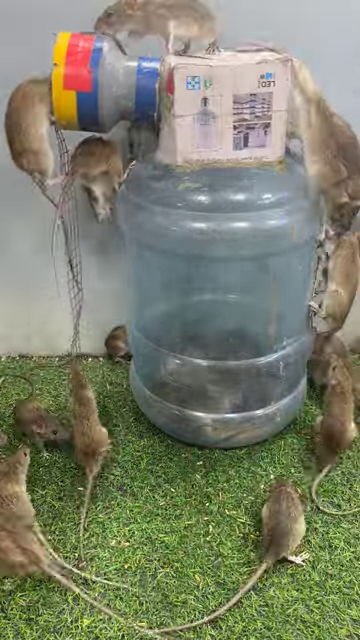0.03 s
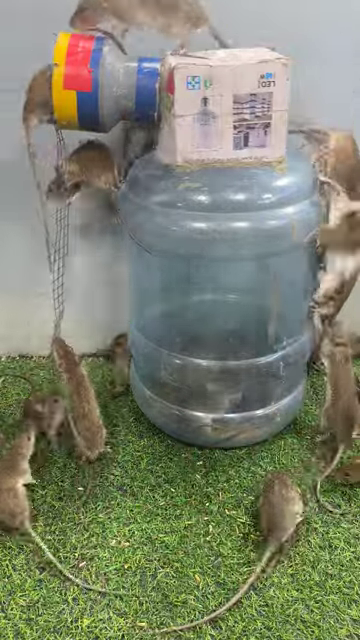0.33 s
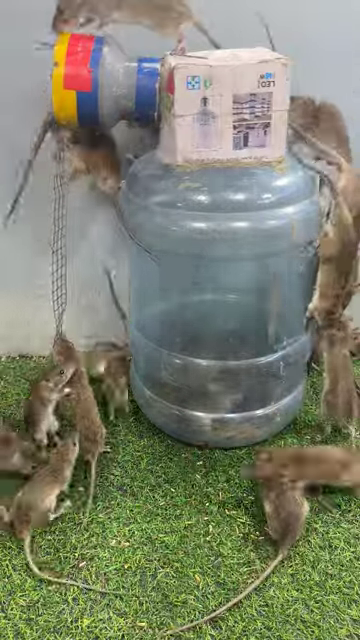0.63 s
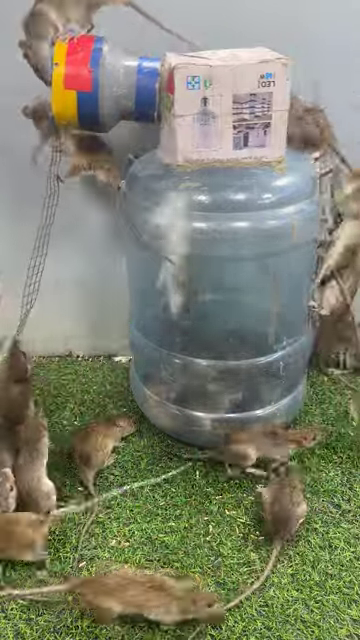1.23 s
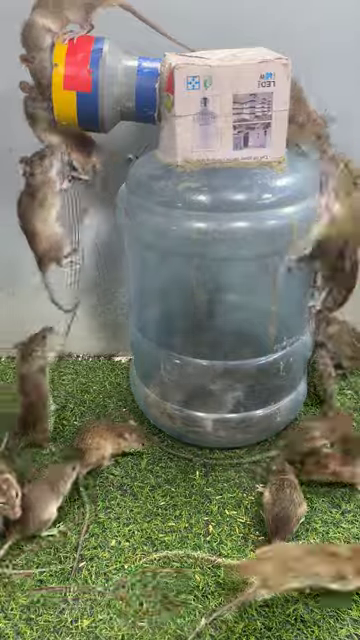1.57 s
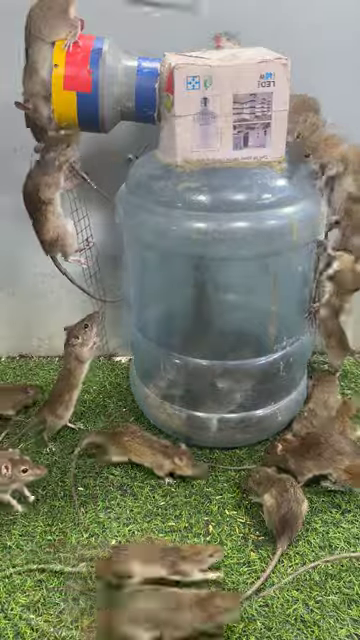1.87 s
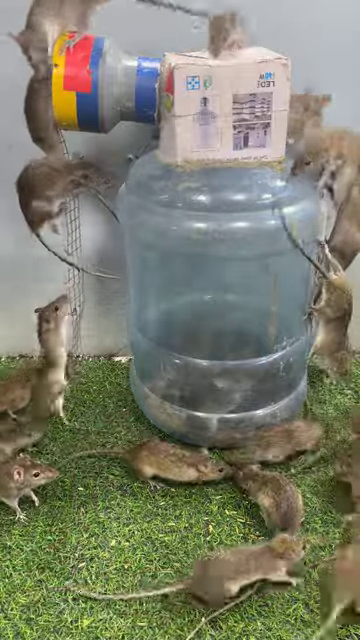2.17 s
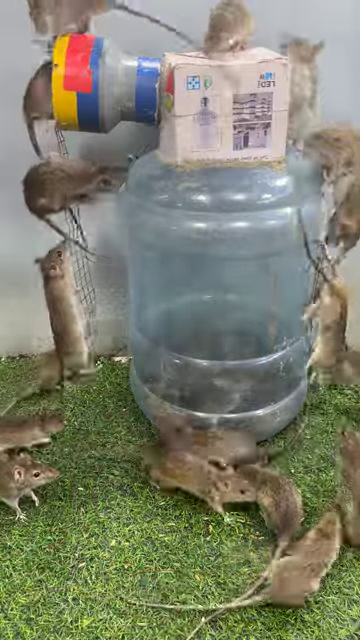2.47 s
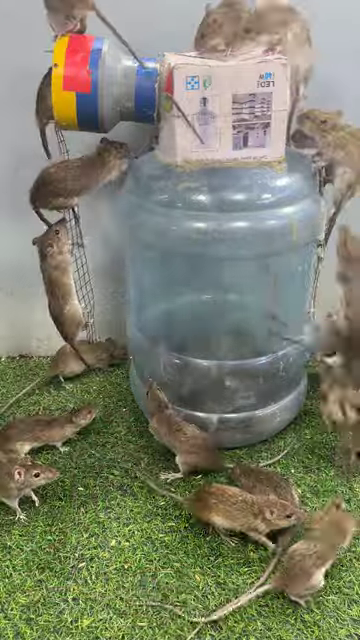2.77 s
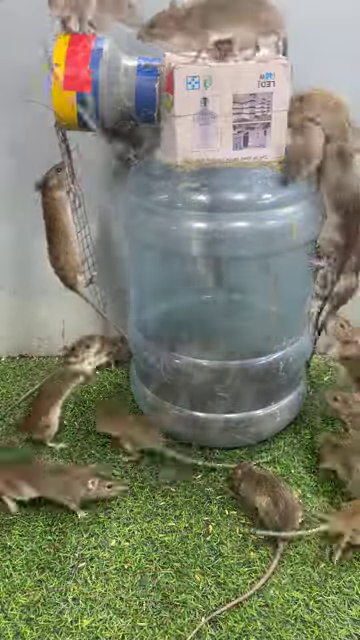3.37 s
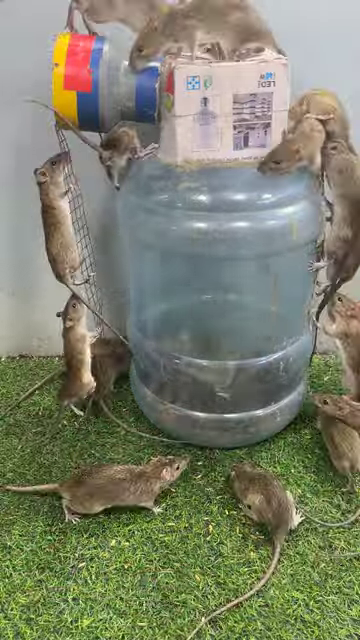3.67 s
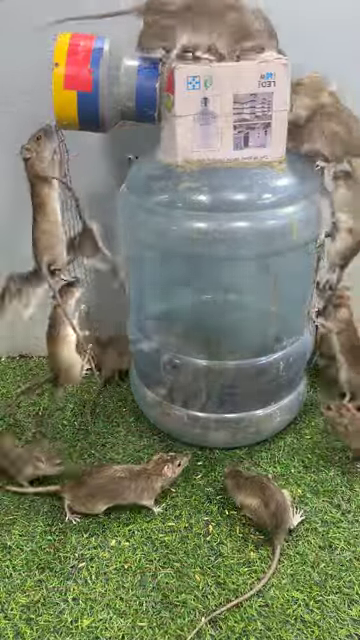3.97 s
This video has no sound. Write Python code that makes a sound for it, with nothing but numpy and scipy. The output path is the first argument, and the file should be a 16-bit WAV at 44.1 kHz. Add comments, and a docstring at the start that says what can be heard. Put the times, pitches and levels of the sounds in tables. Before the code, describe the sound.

Close scurrying of rats in a small hard room: light patter and scratching on plastic, wire mesh and artificial grass, with dull thumps. It eases briefly midway, then resumes with a hollow knock on a jug, over a faint rumble.

```python
"""Rats scramble over artificial grass, a wire mesh and a big plastic water jug that stands against a wall.
Their paws excite damped resonances of the plastic by friction and impact, many tiny contacts merge
into patter and rustle, and claws click. Bodies land with dull thumps, and now and then a bump rings
the modes of the hollow jug. A small hard room reverberates, over a low steady rumble."""
import sys
import numpy as np
from scipy import signal
from scipy.fft import rfft, irfft, next_fast_len
from scipy.io import wavfile
from scipy.ndimage import map_coordinates

SR = 44100
rng = np.random.default_rng(int(sys.argv[2]) if len(sys.argv) > 2 else 0)


def master_out(mix):
    """Clip the mix to full scale and print it as 16-bit PCM to the path in sys.argv[1]."""
    frames = np.transpose(np.atleast_2d(mix))
    ceiling = np.clip(frames, -1, 1)
    pcm = np.round(ceiling * 32767).astype(np.int16)
    wavfile.write(sys.argv[1], SR, pcm)


N = 176400


def amp(db):
    """Amplitude ratio of a level in decibels."""
    return 10 ** (np.asarray(db) / 20)

def unit(x):
    """Normalisation of power: rms 1."""
    return x / np.sqrt(np.mean(x ** 2) + 1e-20)

def burst(x):
    """Normalisation of energy: that of 10 ms at rms 1."""
    return x * np.sqrt(SR / 100 / np.sum(x ** 2))

def add(track, start, x):
    """Superposition: x joins the track at start seconds."""
    i = max(0, round(start * SR))
    track[i:i + len(x)] += x[:max(0, len(track) - i)]

def curve(rows):
    """Linear interpolation of (time, value) rows at every sample."""
    return np.interp(np.arange(N) / SR, *np.transpose(rows))

def along(points, hz):
    """Interpolation of (frequency, value) points on a logarithmic axis."""
    knots, values = np.transpose(points)
    return np.interp(np.log(hz + 1), np.log(knots + 1), values)

def jitter(t, step):
    """Random modulation: Gaussian values, step samples apart, joined by straight lines."""
    return np.interp(t, t[::step], rng.standard_normal(len(t[::step])))

def filtered(x, response):
    """Linear filtering: the spectrum of x times a complex frequency response."""
    n = x.shape[-1]
    size = next_fast_len(n + SR // 10)
    return irfft(rfft(x, size) * response(np.fft.rfftfreq(size, 1 / SR)), size)[..., :n]

def coloured(x, spectrum, size=4096):
    """Minimum-phase filtering: folding the cepstrum makes the given spectrum a causal response."""
    cepstrum = irfft(np.log(amp(along(spectrum, np.fft.rfftfreq(size, 1 / SR)))))
    cepstrum[1:size // 2] *= 2
    cepstrum[size // 2 + 1:] = 0
    return signal.fftconvolve(x, irfft(np.exp(rfft(cepstrum))))[:len(x)]


# Stereo width of diffuse sound: (frequency [Hz], side over mid [dB])
DIFFUSE_WIDTH = [(60, -47), (200, -16.5), (600, -4.5), (10000, -5)]
def spread(mid, side):
    """Diffuse field: left and right are nearly alike at long wavelengths and differ more at short ones."""
    side = filtered(side, lambda hz: amp(along(DIFFUSE_WIDTH, hz)))
    return np.array([mid + side, mid - side])


# Background noise of the room: (frequency [Hz], gain [dB])
RUMBLE_SPECTRUM = [(22, -12), (55, 7.5), (120, -2), (250, -7), (2500, -21.5), (5000, -27), (16000, -57.5)]
def rumble():
    """Stationary noise: the room's low, diffuse rumble."""
    mid, side = [unit(coloured(rng.standard_normal(N), RUMBLE_SPECTRUM)) for _ in range(2)]
    return amp(-47.5) * spread(mid, side)


# Reverberation of the room: (frequency [Hz], time to fall by 60 dB [s])
ROOM_T60 = [(150, 0.35), (3000, 0.27), (14000, 0.16)]
def room(x, segments=20, gap_s=.004):
    """Reverberation: wall echoes decay exponentially; a new tail per segment stands for the rats moving."""
    out = np.zeros((2, N))
    for i, part in enumerate(np.array_split(x, segments)):
        hz, t, noise = signal.stft(rng.standard_normal((2, SR // 3)), SR, nperseg=256)
        decay = amp(-60 * t / along(ROOM_T60, hz)[:, None])
        mid, side = signal.istft(noise * decay, SR, nperseg=256)[1]
        for ear, tail in zip(out, spread(mid, side) / np.linalg.norm(mid)):
            add(ear, i * N / segments / SR + gap_s, signal.fftconvolve(part, tail))
    return out


# Soft landings of a body: (time [s], level [dB], frequency [Hz])
LANDINGS = [(0.419, -13.5, 153.5), (0.486, -20.5, 119), (0.575, -19, 124), (0.603, -20, 119),
            (0.931, -21, 160), (1.15, -22.5, 142.5), (1.611, -13.5, 165.6), (1.681, -21.5, 183),
            (2.45, -27.5, 177.5), (3.67, -23, 171), (3.776, -26.5, 182)]
def thumps(rise_s=.0032, t60_s=.11):
    """Damped oscillation: a soft body lands and sets off a few low cycles."""
    out, t = np.zeros(N), np.arange(SR // 3) / SR
    for start, db, hz in LANDINGS:
        envelope = amp(db - 60 * t / t60_s) * (1 - np.exp(-t / rise_s))
        add(out, start, envelope * np.sin(2 * np.pi * hz * t))
    return out


# Modes of the jug: (frequency [Hz], relative level [dB])
JUG_MODES = [(120, -13), (183, -10), (275, -5.5), (398, -4), (466, -0.5), (532, -5.5), (622, -3.5),
             (785, -4.5), (1025, 1), (1470, -2.5), (1790, 1.5)]
# Bumps of a body against the jug: (time [s], level [dB], cut-off frequency [Hz])
JUG_BUMPS = [(.42, -23.5, 250), (0.6242, -21.5, 610), (.927, -25, 800), (0.942, -24.5, 450),
             (.974, -28.5, 500), (1.613, -29, 600), (2.788, -16.5, 900)]
def jug(rise_cycles=.94, t60_cycles=51):
    """Modal vibration: low modes swell last and ring longest; a bump with a low cut-off barely excites the
    upper ones."""
    out, t = np.zeros(N), np.arange(SR // 2) / SR
    for start, db, cutoff_hz in JUG_BUMPS:
        ring = 0
        for k, (hz, mode_db) in enumerate(JUG_MODES):
            phase = 2 * np.pi * hz * t + .25 * jitter(t, step=200)
            excitation = (-1) ** k / np.hypot(1, hz / cutoff_hz)
            swell = 1 - np.exp(-t * hz / rise_cycles)
            decay = amp(mode_db - 60 * t * hz / t60_cycles)
            ring = ring + excitation * swell * decay * np.sin(phase)
        add(out, start, amp(db) * ring)
    return out


def claw_squeal(start=2.693, length_s=.022, from_hz=6600, to_hz=4300, roughness=.35):
    """Sliding friction: one claw slips with a thin, rough, falling squeal."""
    out, t = np.zeros(N), np.arange(SR // 20) / SR
    progress = np.minimum(t / length_s, 1)
    glide_hz = from_hz + (to_hz - from_hz) * progress
    hz = glide_hz * (1 + roughness * rng.standard_normal(len(t)))
    add(out, start, amp(-45) * np.sin(np.pi * progress) * np.sin(2 * np.pi * np.cumsum(hz) / SR))
    return out


# Spectrum of a claw's contact: (frequency [Hz], gain [dB])
CLAW_SPECTRUM = [(700, -24), (3000, 10.5), (4500, -0.5), (7500, 3), (16000, -2)]
# Claws catching on mesh and plastic: (time [s], level [dB])
CLAW_STRIKES = [(.302, -36.5), (0.412, -34.5), (0.924, -39), (0.933, -34), (1.067, -44), (1.152, -44),
                (1.185, -34), (1.355, -38), (1.628, -29), (1.653, -44), (2.787, -35.5), (3.308, -50)]
def claw_clicks(decay_s=.0029):
    """Hard impact: a very short contact gives a bright, broadband click."""
    out, t = np.zeros(N), np.arange(SR // 20) / SR
    for start, db in CLAW_STRIKES:
        contact = rng.standard_normal(len(t)) * np.exp(-t / decay_s)
        add(out, start, amp(db) * burst(coloured(contact, CLAW_SPECTRUM)))
    return out


def grains(per_s, scatter_db):
    """Poisson process: tiny contacts at random moments, with scattered sizes."""
    impulses = (rng.random(N) < per_s / SR) * rng.choice([-1, 1], N)
    return impulses * amp(scatter_db * np.clip(rng.standard_normal(N), -2, 2))

def wobble(knots_per_s):
    """Spline interpolation of random values: a smooth fluctuation."""
    return map_coordinates(rng.standard_normal(2000), [np.arange(N) * knots_per_s / SR], mode="wrap")


# Spectra of feet on plastic and of soft footfalls: (frequency [Hz], gain [dB])
PATTER_SPECTRUM = [(100, -18.5), (300, 9), (1000, 4), (1700, -4), (2800, -2.5), (4200, -14), (16000, -20)]
PADDING_SPECTRUM = [(25, -29.5), (60, -2.5), (120, 0), (190, -0.5), (260, -10.5), (1500, -42.5)]
# High, hissy rustle; the notch at 12 kHz is not part of the grass's sound: (frequency [Hz], gain [dB])
RUSTLE_SPECTRUM = [(1000, -37), (2800, -4), (6500, 17), (10000, 20.5), (12000, -45), (16000, 20)]
# How busy the rats are, and the weight of their soft footfalls: (time [s], relative level [dB])
ACTIVITY = [(0, -48.5), (.32, -45), (.55, -51.5), (.76, -50), (.97, -41.5), (1.25, -50.5), (1.72, -45.5),
            (1.92, -51), (2.1, -62), (2.26, -52), (2.35, -52.5), (2.55, -56.5), (3.02, -47), (3.22, -52),
            (3.6, -47), (3.79, -51.5), (4, -41)]
FOOTFALL_WEIGHT = [(0, -35.5), (.7, -35.5), (1.3, -42), (1.8, -40.5), (2.15, -51), (2.8, -43),
                   (3.55, -47.5), (4, -44)]
def scurry(flurry_db=5):
    """Shot noise: many small contacts merge into patter, hissy rustle, stray claw ticks and padding."""
    flurry = amp(flurry_db * np.tanh(wobble(knots_per_s=45)))
    patter = unit(coloured(grains(per_s=1400, scatter_db=5) * flurry, PATTER_SPECTRUM))
    rustle = unit(coloured(grains(per_s=2500, scatter_db=5) * flurry, RUSTLE_SPECTRUM))
    ticks = unit(coloured(grains(per_s=61, scatter_db=3), CLAW_SPECTRUM))
    padding = unit(coloured(grains(per_s=250, scatter_db=1.5), PADDING_SPECTRUM))
    bright = amp(3.5) * patter + amp(-4.5) * rustle + amp(-13.5) * ticks
    return amp(curve(ACTIVITY)) * bright + amp(curve(FOOTFALL_WEIGHT) + .5) * padding


def resonance(x, hz, q):
    """Resonance with steep skirts: two equal second-order band-passes in cascade."""
    return filtered(x, lambda f: (1j * f * hz / q / (hz * hz - f * f + 1j * f * hz / q)) ** 2)


# Spectrum of a paw rubbing plastic: (frequency [Hz], gain [dB])
SCUFF_SPECTRUM = [(200, 18), (1000, 9.5), (2700, 6), (4200, -1.5), (8000, 3), (16000, -1)]
def scuff(hz, decay_s=.0077, q=.64, grit_db=3.5):
    """Friction noise: a gritty push swells and dies, driving a broad resonance of the plastic."""
    t = np.arange(SR // 6) / SR
    grit = rng.choice([-1, 1], len(t)) * amp(grit_db * jitter(t, step=40))
    rise_s = decay_s / 4
    push = grit * np.exp(-t / decay_s) * (1 - np.exp(-t / rise_s))
    return burst(coloured(resonance(push, hz, q), SCUFF_SPECTRUM))


# Quick hollow taps on plastic: (time [s], relative level [dB], frequency [Hz])
PAW_TAPS = [(.376, -31.5, 1430), (0.964, -26, 1110), (1.166, -26.5, 1285), (1.529, -33.5, 1520),
            (2.2, -44, 1710), (3.163, -35.5, 2030), (3.164, -33.5, 1066), (3.557, -35, 1340),
            (3.828, -30.5, 1590)]
def taps(spot_q=12.6, wall_hz=985, wall_q=15, wall_db=-3.5, rise_s=.00041, skid_db=-4):
    """Free vibration: the struck spot rings briefly, the wall around it lower and longer; claws skid."""
    out, t = np.zeros(N), np.arange(SR // 20) / SR
    for start, db, spot_hz in PAW_TAPS:
        for hz, q, part_db in (spot_hz, spot_q, 0), (wall_hz, wall_q, wall_db):
            phase = 2 * np.pi * hz * t + .38 * jitter(t, step=30)
            envelope = np.exp(-np.pi * hz * t / q) * (1 - np.exp(-t / rise_s))
            add(out, start, amp(db + part_db) * burst(envelope * np.sin(phase)))
        add(out, start, amp(db + skid_db) * scuff(spot_hz))
    return out


# Paws scuffing plastic: (time [s], relative level [dB], resonance frequency [Hz], decay time [s])
PAW_SCUFFS = [(.048, -29.5, 1490, 0.014), (0.111, -29, 850, 0.0057), (0.261, -30, 1310, .01),
              (.299, -25.5, 990, 0.019), (0.622, -22, 910, 0.0055), (0.831, -30, 1420, 0.025),
              (0.883, -25, 1270, 0.058), (.9246, -20.5, 850, 0.015), (0.959, -29.5, 1870, 0.0064),
              (0.976, -26, 1620, 0.0056), (1.525, -26.5, 1370, .01), (1.601, -22, 900, 0.023),
              (1.653, -28, 2450, 0.0045), (2.318, -35, 1270, .014), (2.648, -33, 1160, 0.016),
              (2.683, -28.5, 617, .008), (2.766, -27, 770, 0.013), (2.787, -24.5, 1800, 0.0064),
              (3.299, -29, 2330, 0.0046), (3.553, -33, 1470, 0.0068), (3.7, -29.5, 2500, 0.0099),
              (3.866, -29, 544, 0.026)]
# Small claw scratches: (time [s], relative level [dB])
CLAW_SCRATCHES = [(.181, -56), (.411, -30), (.471, -36.5), (0.768, -38), (1.047, -33), (1.187, -30.5),
                  (1.279, -39.5), (1.355, -37), (1.436, -36), (1.704, -33.5), (1.842, -31.5),
                  (1.978, -38.5), (2.92, -36), (2.962, -41), (3.268, -40), (3.399, -37.5), (3.925, -45),
                  (3.974, -38)]
def paws(scratch_hz=1480):
    """Forced vibration: each scuff drives the plastic at its own pitch, each scratch at a random one."""
    out = np.zeros(N)
    for start, db, hz, decay_s in PAW_SCUFFS:
        add(out, start, amp(db) * scuff(hz, decay_s))
    for start, db in CLAW_SCRATCHES:
        hz = scratch_hz * np.exp(rng.normal(0, .35))
        add(out, start, amp(db) * scuff(hz))
    return out


def scene():
    """Superposition of the rats' direct sound, its reverberation and the room's own noise."""
    feet = amp(-4) * (paws() + taps()) + scurry()
    bodies = jug() + thumps()
    claws = claw_clicks() + claw_squeal()
    reverberation = room(feet + amp(-2) * bodies + amp(-6) * claws)
    return feet + bodies + claws + amp(-6.5) * reverberation + rumble()


# Phase between the two microphone ports: (frequency [Hz], lead of the left port [rad])
PORT_LEAD = [(4500, 0), (9500, -2.5), (14000, -2.9)]
def record(dry, top_hz=16000):
    """Phase shift and band limit: the two ports part in phase in the treble; nothing passes above top_hz."""
    def response(hz):
        phase = np.outer([.5, -.5], along(PORT_LEAD, hz))
        return np.exp(1j * phase) * (hz < top_hz)
    return filtered(dry, response)


dry = scene()
out = record(dry)
master_out(out)
```